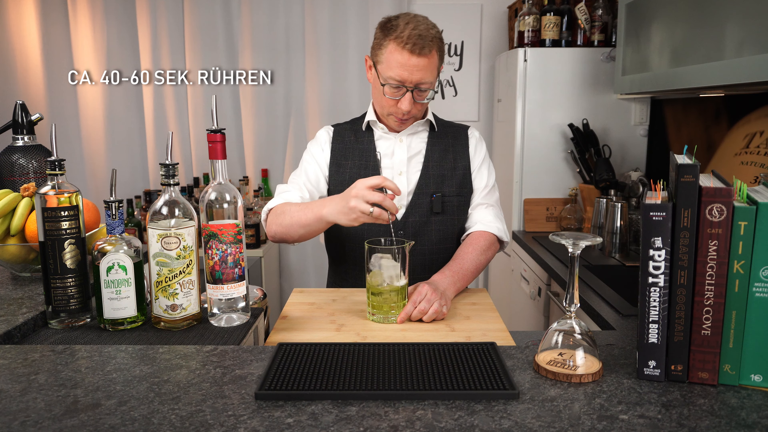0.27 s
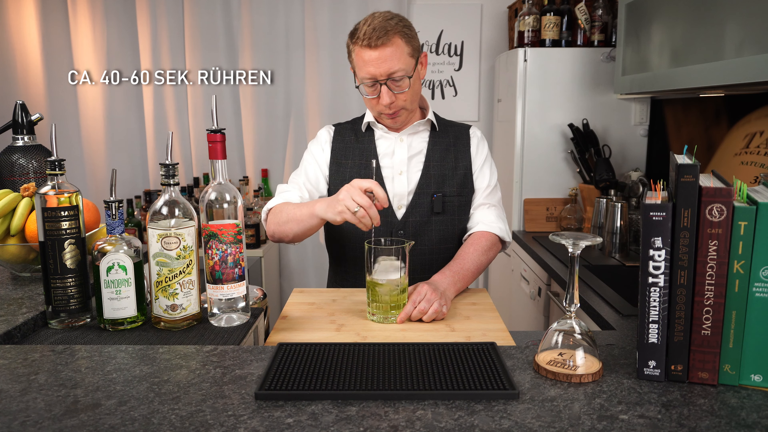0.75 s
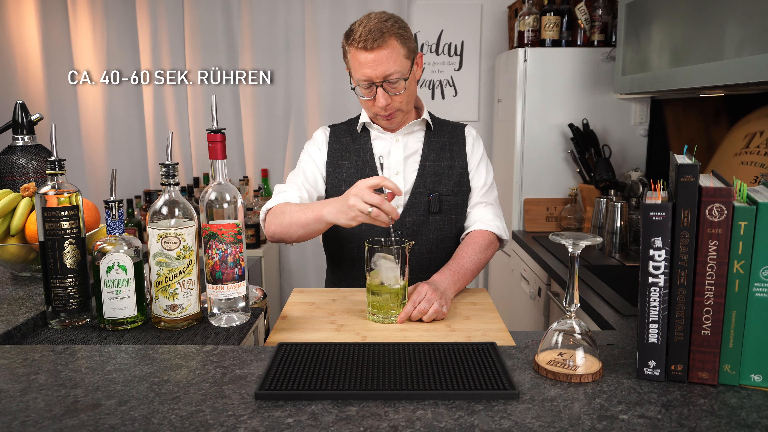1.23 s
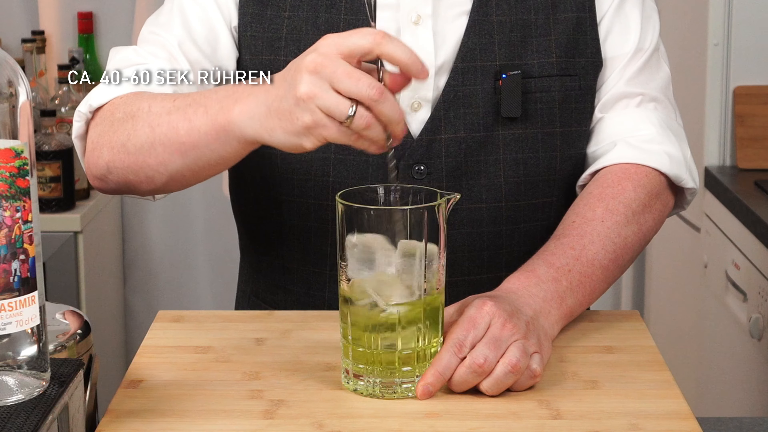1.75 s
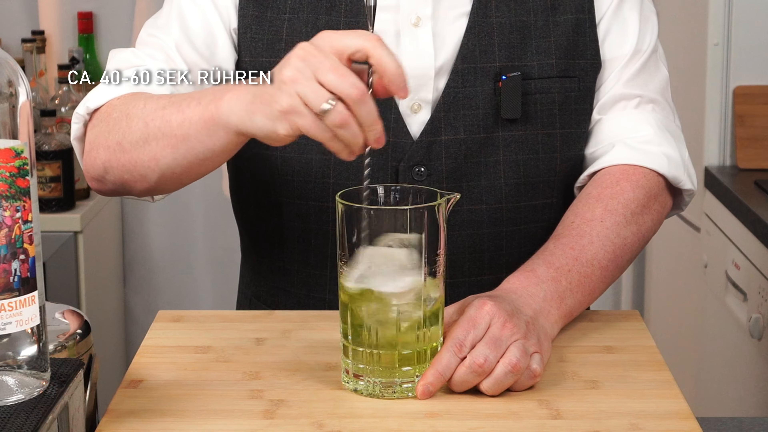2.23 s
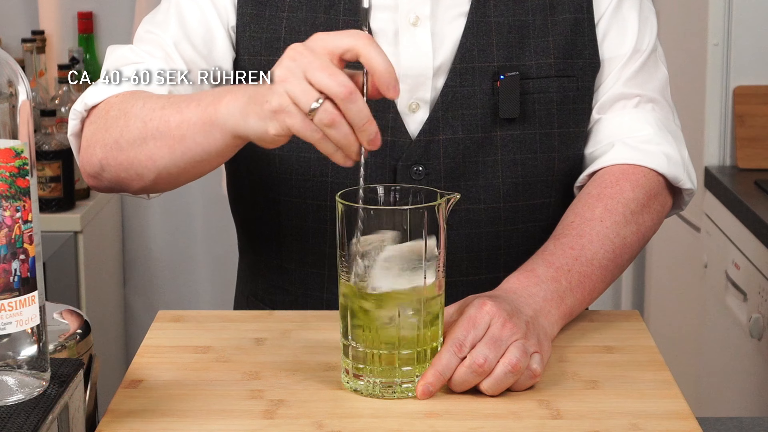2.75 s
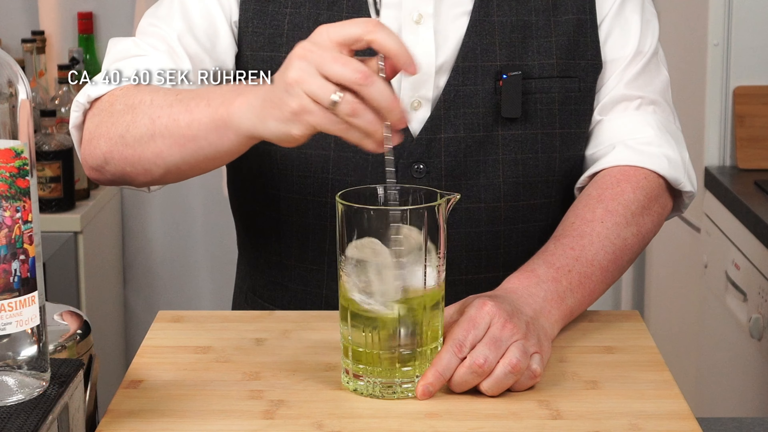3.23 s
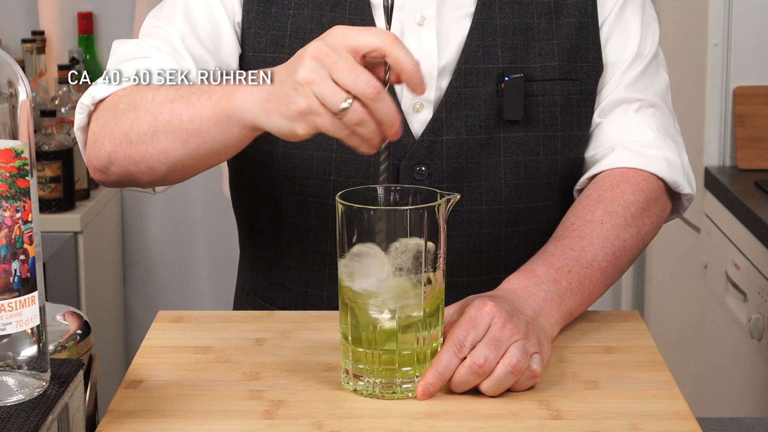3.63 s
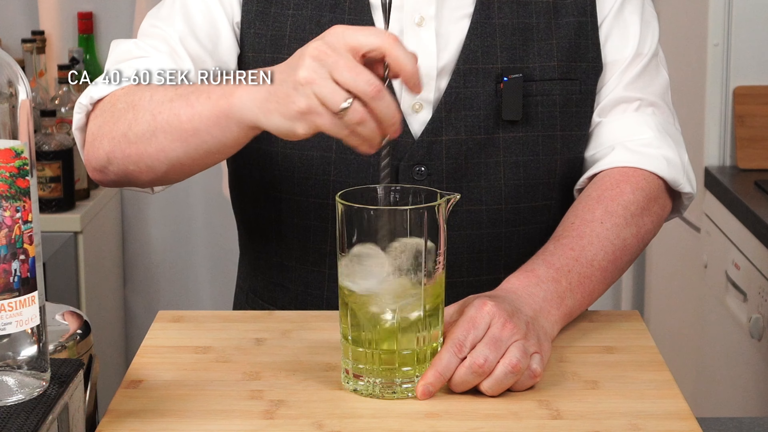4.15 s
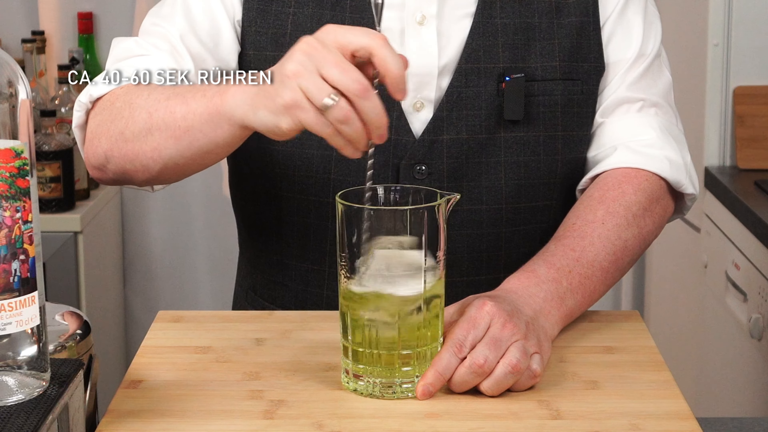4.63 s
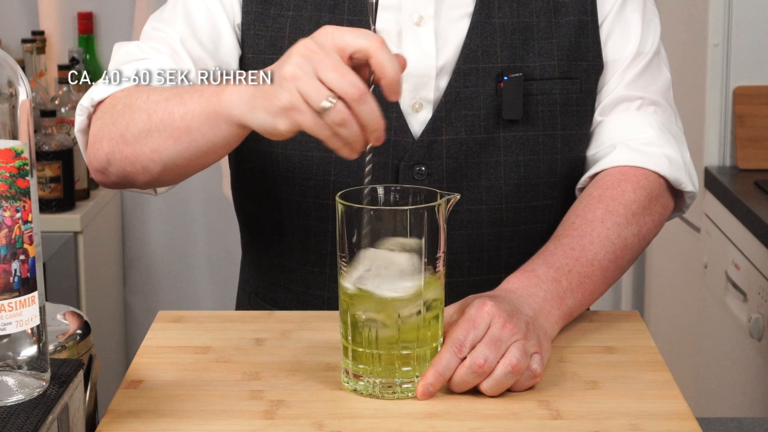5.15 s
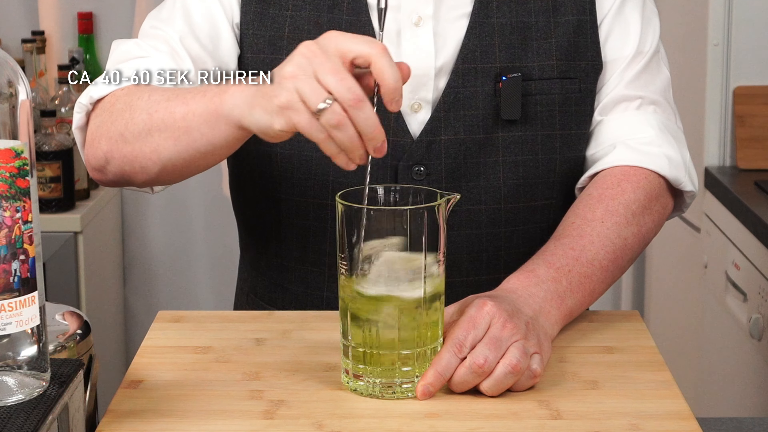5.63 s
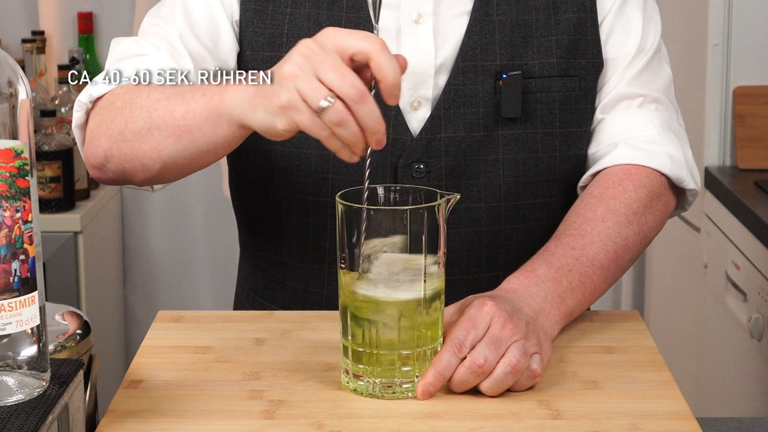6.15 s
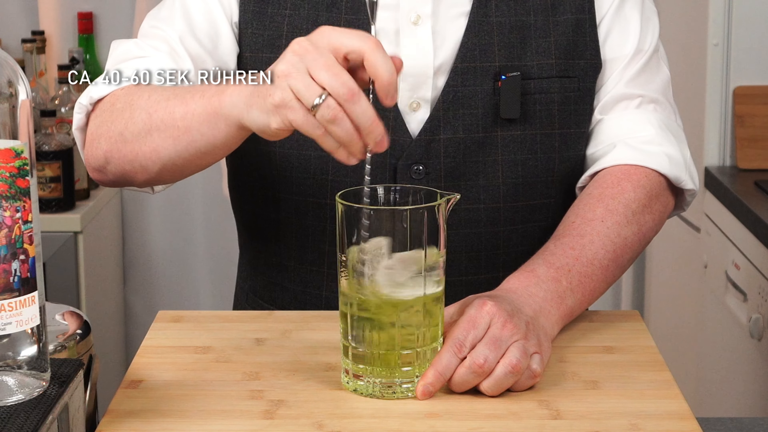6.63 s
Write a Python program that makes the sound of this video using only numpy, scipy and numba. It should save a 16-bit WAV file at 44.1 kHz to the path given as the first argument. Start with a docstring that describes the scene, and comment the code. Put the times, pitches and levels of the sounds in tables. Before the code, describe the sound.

A metal spoon stirs ice cubes in a thick glass, with rapid clinks, clacks and soft thuds into a wooden board.

```python
"""A small kitchen, heard in mono from close by: a bar spoon stirs ice in a thick mixing glass on a wooden board.
From the start, cubes and spoon knock the wall, whose modes ring briefly; cubes clack, blows thud into the board.
The highest wall ring is freest in the first two seconds; a dull low bump passes through the counter near 2.4 s.
Wall pitch then sags; cube clacks crowd in from about 4 s, with spoon ticks and fading spray to the end.
Throughout, small touches murmur on the same modes over a hiss of scraping ice, faint echoes and room tone."""
import sys
import numpy as np
from scipy import signal
from scipy.fft import rfft, irfft, next_fast_len
from scipy.io import wavfile
from scipy.ndimage import uniform_filter1d
from numba import njit

SR = 44100
rng = np.random.default_rng(int(sys.argv[2]) if len(sys.argv) > 2 else 0)


def dump_mix(stems):
    """Bounce the given channels to the path in sys.argv[1] as a 16-bit WAV at rate SR."""
    frames = np.atleast_2d(stems).T  # one column per channel
    limited = np.clip(frames, -1, 1)  # hard clip at full scale
    pcm = np.round(limited * 32767).astype(np.int16)
    wavfile.write(sys.argv[1], SR, pcm)


N = 303408

# steady hush of the kitchen: (frequency [Hz], relative level [dB])
ROOM_TONE = [(20, -22), (45, -3), (65, -1), (90, 5), (120, -6), (200, -5), (1000, -12), (4000, -25),
             (8000, -38), (16000, -44)]
# dull low bump through the counter: (time [s], level [dB], starting frequency [Hz], t60 [s])
BUMP_THROUGH_COUNTER = (2.416, -25, 72, .13)
# small touches: (time [s], through the base [dB], on the wall [dB], cube on cube [dB], ping on the rim [dB])
PATTER = [(0.0, -31.5, -36.5, -45, -44), (0.65, -35.5, -37.5, -42, -53), (1.09, -29, -32.5, -43.5, -44),
          (1.22, -32, -33, -41.5, -45.5), (2.39, -30.5, -35, -47.5, -50.5), (2.63, -32.5, -36, -49.5, -62),
          (2.95, -29.5, -38, -44.5, -53), (3.14, -31.5, -40.5, -46, -53), (3.73, -31, -30.5, -36.5, -43.5),
          (3.95, -30, -34.5, -37, -45.5), (4.35, -33, -37.5, -43.5, -52.5),
          (4.92, -33.5, -34.5, -44.5, -44), (5.34, -34, -34.5, -39, -34), (5.88, -34, -38, -47, -52.5),
          (6.46, -33.5, -31, -49.5, -43), (6.88, -30.5, -36, -42, -50)]
# pitch of the wall, lowered as melt water loads it: (time [s], pitch [factor])
WATER_LOADING = [(0, 1.013), (1.5, 1.016), (3, 1.005), (5, .99), (6.88, 0.98)]
# modes of the wooden board: (nominal frequency [Hz], relative level [dB], t60 [s])
BOARD_MODES = [(195.8, -17, 0.13), (241.4, -18, 0.2), (290.4, -16, 0.16), (402, -18.5, 0.22),
               (543.6, -3.5, 0.063), (682, -8, 0.054), (952, -4, 0.03), (1154, -1, 0.036),
               (1508, -21, 0.11)]
# modes of the steel spoon: (nominal frequency [Hz], relative level [dB], t60 [s])
SPOON_MODES = [(6550, -4, .035), (7560, -3, .05), (8980, -2, .05), (9550, -7, .035), (10400, -5, .05),
               (11750, -7, .05), (12200, -10, .035), (14000, -18, .04), (15600, -18, .03)]
# modes of the ice: (nominal frequency [Hz], relative level [dB], t60 [s])
ICE_MODES = [(2700, -20, 0.084), (2740, -18.5, 0.0033), (2995, -5.5, 0.008), (3357, -2, 0.011)]
# low modes of the glass wall: (nominal frequency [Hz], relative level [dB], t60 [s])
WALL_HUM = [(1780, -49, 0.037), (1857.6, 4, 0.075), (1897, 9, 0.044), (2036, -25.5, 0.085)]
# middle modes of the glass wall: (nominal frequency [Hz], relative level [dB], t60 [s])
WALL_PING = [(4550, -8, 0.06), (4625, -10, 0.05), (4860, -19, 0.03), (5150, -31, 0.03), (6020, -17, 0.045),
             (6230, -18, 0.04)]
# high modes of the glass wall: (nominal frequency [Hz], relative level [dB], t60 [s])
WALL_OVERTONES = [(8030, 0, .13), (7950, -2, .1), (11850, -20, .06)]
# how freely the dry upper wall sings its overtones: (time [s], level against the ping [dB])
OVERTONE_SHARE = [(0, -28), (.36, -23), (1.8, -27), (2.6, -39), (4, -37), (6.88, -40)]
# chance spread of mode strengths from knock to knock: body -> (spread [dB])
MODE_SCATTER = {"board": 1.5, "wall": 2.5, "ice": 4, "spoon": 4}
# band of wall overtones and spoon: (low edge [Hz], high edge [Hz])
TREBLE_BAND = (4200, 15800)
# ice shoved against the glass, thudding into the board: (time [s], thud level [dB])
SHOVES = [(0.237, -19.5), (0.44, -25), (0.638, -20), (0.673, -18.5), (0.796, -10), (0.875, -17.5),
          (0.979, -33), (1.055, -22), (1.083, -14.5), (1.172, -19), (1.203, -14), (1.408, -17),
          (1.516, -31), (1.739, -14.5), (1.877, -25), (1.968, -19), (2.038, -18.5), (2.07, -17.5),
          (2.272, -13), (2.323, -23), (2.617, -24.5), (2.718, -22.5), (2.811, -7), (2.878, -24),
          (3.002, -34), (3.101, -12.5), (3.147, -22), (3.261, -19.5), (3.371, -15.5), (3.428, -18.5),
          (3.537, -12), (3.809, -20.5), (3.874, -9.5), (4.06, -14), (4.154, -18.5), (4.316, -18.5),
          (4.405, -17.5), (4.47, -22.5), (4.575, -25), (4.833, -16), (4.927, -13), (5.056, -16.5),
          (5.089, -19), (5.134, -29), (5.39, -27), (5.431, -8.5), (5.525, -53.5), (5.561, -26),
          (5.682, -15), (5.741, -20), (5.978, -24), (6.127, -19), (6.303, -21.5), (6.648, -20),
          (6.831, -22.5)]
# steel spoon ticking on glass or ice: (time [s], tick level [dB])
TICKS = [(0.3607, -45), (0.7983, -33.5), (1.0086, -44), (1.0374, -52), (1.0845, -36), (1.0937, -50),
         (1.507, -53), (1.7404, -45), (1.7964, -55), (2.0027, -47.5), (2.2752, -39), (2.4204, -45),
         (2.5714, -54), (2.81, -30.5), (3.1007, -36), (3.3708, -42), (3.3984, -50), (3.8719, -32.5),
         (3.927, -55), (3.9571, -35), (4.1537, -55), (4.4338, -49), (4.5453, -50), (4.7903, -52),
         (4.9285, -36.5), (4.9524, -51), (5.0559, -56), (5.1898, -49), (5.4035, -42), (5.4323, -31),
         (5.4634, -45), (5.6693, -45.5), (5.682, -33), (5.7522, -36), (5.7753, -39), (5.9779, -41.5),
         (6.4812, -56), (6.5305, -33.5), (6.5551, -35.5), (6.595, -57), (6.832, -56)]
# cubes clacking together: (time [s], clack level [dB], frequency [Hz])
CLACKS = [(0.0539, -24, 2970), (0.1271, -28, 2420), (0.157, -20.5, 2340), (0.2357, -20, 3580),
          (0.2693, -26, 2550), (0.3601, -18, 2494), (0.6043, -22, 3490), (0.6783, -16.5, 2520),
          (0.9463, -34, 3440), (0.976, -28, 2450), (1.0083, -23, 2490), (1.1656, -29, 3300),
          (1.2036, -38, 2600), (1.307, -23.5, 2620), (1.3616, -24, 2460), (1.41, -15.5, 2510),
          (1.4944, -40, 3500), (1.5085, -15.5, 3500), (1.5802, -24, 3360), (1.6765, -31, 2590),
          (1.7963, -34, 2460), (1.7956, -21, 3530), (1.8747, -25.5, 2560), (1.9825, -24, 2570),
          (2.5506, -26, 2750), (2.7512, -25, 2600), (2.9547, -28, 2640), (3.048, -26, 2710),
          (3.3371, -21.5, 2560), (3.4931, -21.5, 3380), (3.8728, -24, 3080), (3.9065, -14, 2860),
          (3.9555, -20.5, 2860), (3.9796, -30, 3350), (4.1839, -25, 2830), (4.3182, -27.5, 2890),
          (4.345, -14, 2630), (4.4202, -18, 3050), (4.4329, -11, 2750), (4.5436, -20.5, 3370),
          (4.6083, -22.5, 2710), (4.7017, -17.5, 2880), (4.7685, -24, 2650), (4.7913, -16, 3120),
          (4.855, -15.5, 2720), (4.9375, -23, 2810), (4.9512, -17, 2990), (5.0559, -22, 3110),
          (5.1068, -26, 2860), (5.135, -17.5, 2540), (5.1916, -18, 2780), (5.2072, -14.5, 3080),
          (5.2678, -22.5, 2940), (5.4028, -18, 2900), (5.4656, -15.5, 3020), (5.5125, -27.5, 2750),
          (5.5258, -19.5, 2730), (5.6225, -26.5, 2940), (5.7082, -24, 2740), (5.8468, -29, 2620),
          (5.8844, -24.5, 2910), (5.917, -27.5, 2620), (5.9771, -21, 2860), (6.1295, -27.5, 3030),
          (6.1594, -25.5, 2850), (6.2293, -26.5, 2650), (6.4803, -21, 2500), (6.559, -23, 3270),
          (6.74, -26.5, 2750), (6.834, -25.5, 3520)]
# cubes clinking on the wall: (time [s], wall hum level [dB], wall ping level [dB])
CLINKS = [(0.0553, -19, -22.5), (0.1281, -27, -41), (0.1575, -21, -33), (0.2342, -25, -33),
          (0.2698, -20, -33), (0.3311, -31, -33), (0.3456, -17, -44), (0.3616, -13, -9.5),
          (0.4534, -20.5, -28), (0.5267, -15.5, -32), (0.606, -23, -42), (0.6394, -20.5, -44),
          (0.6724, -22, -32), (0.6814, -19.5, -16.5), (0.7107, -25, -27.5), (0.7575, -23, -38),
          (0.7657, -20.5, -29.5), (0.8305, -19, -29.5), (0.8759, -20.5, -30.5), (0.9492, -19, -53),
          (1.0096, -8, -25.5), (1.0374, -12.5, -33), (1.0934, -12, -38), (1.1265, -24, -30),
          (1.2037, -16, -47), (1.2322, -20, -33), (1.3069, -15.5, -24.5), (1.3149, -12.5, -22),
          (1.4097, -13.5, -22.5), (1.4231, -15.5, -26), (1.5105, -12.5, -19), (1.5808, -25, -41),
          (1.5891, -22.5, -34), (1.6781, -14.5, -54), (1.7988, -13.5, -25), (1.8756, -29, -37),
          (2.003, -26, -27), (2.0692, -23.5, -40), (2.3231, -17.5, -34), (2.4917, -24, -74),
          (2.5711, -15, -30.5), (2.6304, -25.5, -45), (2.7526, -21.5, -59), (2.7656, -16, -41),
          (2.8784, -30, -54), (2.9038, -22, -41), (2.9552, -30, -45), (3.0188, -29.5, -51),
          (3.084, -24, -52), (3.1216, -17.5, -30), (3.3041, -21.5, -39), (3.3383, -18.5, -36),
          (3.398, -31, -32.5), (3.4935, -19.5, -28), (3.6523, -21.5, -25), (3.692, -22, -43),
          (3.7232, -30, -31.5), (3.8437, -24, -39), (3.9165, -17, -41), (3.9264, -20, -23),
          (3.9574, -11.5, -16), (4.1087, -24, -45), (4.131, -22, -32.5), (4.1504, -36, -30),
          (4.3176, -24, -36), (4.3555, -35, -38), (4.384, -17.5, -45), (4.4338, -25, -43),
          (4.512, -35, -32), (4.6069, -19, -28.5), (4.6448, -25, -36.5), (4.791, -19, -43),
          (4.8536, -21, -42), (4.951, -23, -29.5), (5.1056, -27, -25.5), (5.1362, -20.5, -29),
          (5.19, -18.5, -32), (5.2058, -21, -20), (5.244, -27.5, -45), (5.3548, -26, -28),
          (5.4033, -20, -24), (5.4645, -12.5, -31), (5.4874, -30, -27.5), (5.5263, -18, -44),
          (5.5643, -18, -33), (5.5962, -24, -54), (5.7079, -20.5, -26.5), (5.7533, -23, -25),
          (5.7744, -22, -28), (5.8461, -16, -28.5), (5.9783, -18, -19), (6.0118, -23, -32.5),
          (6.0342, -18.5, -37), (6.1233, -26, -31), (6.1599, -24, -33), (6.2322, -16.5, -28),
          (6.347, -27, -46), (6.3836, -27.5, -32), (6.4477, -19, -49), (6.4783, -22, -22),
          (6.5318, -24, -26), (6.5954, -24.5, -56), (6.6478, -27.5, -57), (6.7441, -16.5, -30),
          (6.7603, -21, -28), (6.7756, -19, -32), (6.8331, -17.5, -29.5)]

ROOM_TONE_DB, KITCHEN_DB = -54.5, -24
KITCHEN_T60_S, WALL_CUT_HZ = 0.28, 10000  # decay before the walls' treble loss
CUTOFF_HZ = 16500
# every knock also wakes the other bodies, at these offsets from its own sound
CLINK_THUD_DB, CLINK_CLACK_DB, CLINK_TICK_DB = -14.5, -3, -37  # the tick is set against the ping
CLACK_HUM_DB, CLACK_THUD_DB, CLACK_PING_DB, CLACK_TICK_DB = -14, -12.5, -16, -49.5
SHOVE_HUM_DB, SHOVE_CLACK_DB, SHOVE_PING_DB, SHOVE_TICK_DB = -17, -15, -23, -54.5
TICK_HUM_DB, TICK_THUD_DB, TICK_CLACK_DB, TICK_PING_DB = -1, 14, 5.5, 1.5
SIDE_SCATTER_DB = 3
RIM_DB, SCRAPE_DB = -3, -13  # against the rim patter
OVERTONE_SAG = 0.35  # exponent: the overtones follow the wall's pitch only in part
SPRAY_PER_S, SPRAY_SMOOTH = 1500, 0.6  # mean droplet rate before clumping, and the floor of even hiss
SPRAY_T60_S = 0.12
THUD_PITCH = 0.98  # a firm blow rings the board slightly lower


def from_db(db):
    """Decibels to gain."""
    return 10 ** (np.asarray(db) / 20)


def rms_one(x):
    """Scale to rms 1."""
    return x / np.sqrt(np.mean(x ** 2) + 1e-20)


def in_time(rows):
    """One value per sample for each column after the time."""
    s, *columns = np.transpose(rows)
    return [np.interp(np.arange(N) / SR, s, column) for column in columns]


def drift(rate_hz):
    """Slow chance of rms 1: noise through two equal one-pole low-passes, drawn every 40 samples."""
    r = np.exp(-80 * np.pi * rate_hz / SR)
    noise = rng.standard_normal(N // 40 + 2002)
    slow = signal.lfilter([1], [1, -2 * r, r * r], noise)[2000:]  # drop the filter's run-in
    return np.interp(np.arange(N) / 40, np.arange(len(slow)), rms_one(slow))


def band(x, low_hz, high_hz):
    """Soft contacts leave little far above or below the modes they excite."""
    return signal.sosfilt(signal.butter(3, [low_hz, high_hz], "band", fs=SR, output="sos"), x)


def room_tone():
    """Steady coloured hush of the kitchen: noise shaped by a smooth spectrum."""
    hz, db = np.transpose(ROOM_TONE)
    bins = np.maximum(np.arange(N // 2 + 1) * SR / N, 1)
    colour = from_db(np.interp(np.log(bins), np.log(hz), db))
    hush = irfft(rfft(rng.standard_normal(N)) * colour, N)
    return from_db(ROOM_TONE_DB) * rms_one(hush)


def kitchen(x):
    """Reflections of the small kitchen: ten feedback delays, duller on every round."""
    size = next_fast_len(N + SR)
    w = 2 * np.pi * np.arange(size // 2 + 1) / size
    dull = 1 / (1 + 1j * w * SR / (2 * np.pi * WALL_CUT_HZ))
    wet = 0
    for k, lag in enumerate(np.geomspace(0.009, 0.031, num=10) * SR):
        loop = from_db(-60 * lag / SR / KITCHEN_T60_S) * dull * np.exp(-1j * w * lag)
        wet = wet + (-1) ** k * loop / (1 - loop)
    return irfft(rfft(x, size) * wet, size)[:N]


def bump():
    """One soft push rings the counter: a low sine that swells fast, dies and glides down."""
    s, db, hz, t60 = BUMP_THROUGH_COUNTER
    t = np.maximum(np.arange(N) / SR - s, 0)
    swell = 1 - np.exp(-t / 0.0019)
    return from_db(db - 60 * t / t60) * swell * np.sin(2 * np.pi * hz * t * (1 - t))


@njit
def resonate(clicks, cos_w, sin_w, r):
    """A two-pole ring whose pitch may move."""
    out = np.zeros(len(clicks))
    for i in range(2, len(clicks)):
        out[i] = 2 * r * cos_w[i] * out[i - 1] - r * r * out[i - 2] + sin_w[i] * clicks[i - 1]
    return out


def ring(clicks, hz, t60):
    """A unit click sets a dying sine of height about 1 ringing."""
    w = 2 * np.pi * hz / SR * np.ones(N)
    return resonate(clicks + 1e-18, np.cos(w), np.sin(w), from_db(-60 / (t60 * SR)))


def touches(per_s, spread_db):
    """Random clicks of uneven size, in clumps; rms 1."""
    size_db = spread_db * np.minimum(rng.exponential(1, N), 4)
    sizes = from_db(size_db) * rng.choice([-1, 1], N)
    chance = per_s * from_db(4 * drift(9)) / SR
    return rms_one(sizes * (rng.random(N) < chance))


def pattered(modes, clicks, level_db, pitch):
    """Small touches keep the modes murmuring."""
    murmur = sum(from_db(db) * ring(clicks, hz * pitch, t60) for hz, db, t60 in modes)
    return from_db(level_db) * rms_one(murmur)


def chatter(count, t60):
    """Wet ice skips on the surface: a firm click, then uneven ones within 14 ms; unit energy per row."""
    size = (count, 600)
    skips = rng.standard_normal(size) * (rng.random(size) < 0.03)
    skips[:, 0] = 2.12
    skips = skips * from_db(-60 * np.arange(600) / (t60 * SR))
    return skips / np.sqrt(np.sum(skips ** 2, axis=1, keepdims=True))


def blows(s, level_db, contact):
    """Each knock is a short contact at its own level, shaped by its row of contact."""
    at = np.round(s * SR).astype(int)[:, None] + np.arange(contact.shape[1])
    clicks = np.zeros(N + contact.shape[1])
    np.add.at(clicks, at, from_db(level_db)[:, None] * contact)
    return clicks[:N]


def struck(modes, s, knock_db, contact, pitch, scatter_db):
    """Each knock lands elsewhere, so its energy is shared out among the modes anew."""
    usual = from_db(np.array(modes)[:, 1])
    share = usual * from_db(scatter_db * rng.normal(0, 1, (len(s), len(modes))))
    share_db = 20 * np.log10(share / np.linalg.norm(share, axis=1, keepdims=True))
    total = 0
    for k, (hz, _, t60) in enumerate(modes):
        total = total + ring(blows(s, knock_db + share_db[:, k], contact), hz * pitch, t60)
    return total


def crack(s, level_db, t60):
    """A burst of noise that dies after each knock."""
    clicks = blows(s, level_db, np.ones((len(s), 1)))
    dying = signal.lfilter([1], [1, -from_db(-60 / (t60 * SR))], clicks)
    return dying * rng.standard_normal(N)


def beside(level_db, *offsets_db):
    """Levels of the other bodies that a knock wakes, each scattered by chance."""
    return [level_db + offset + SIDE_SCATTER_DB * rng.standard_normal(len(level_db)) for offset in offsets_db]


def knocks():
    """All knocks, grouped by kind: rows of time [s], then hum, thud, clack, ping and tick levels [dB]."""
    s, thud = np.transpose(SHOVES)
    hum, clack, ping, tick = beside(thud, SHOVE_HUM_DB, SHOVE_CLACK_DB, SHOVE_PING_DB, SHOVE_TICK_DB)
    shoves = [s, hum, thud, clack, ping, tick]
    s, tick = np.transpose(TICKS)
    hum, thud, clack, ping = beside(tick, TICK_HUM_DB, TICK_THUD_DB, TICK_CLACK_DB, TICK_PING_DB)
    ticks = [s, hum, thud, clack, ping, tick]
    s, clack, _ = np.transpose(CLACKS)
    hum, thud, ping, tick = beside(clack, CLACK_HUM_DB, CLACK_THUD_DB, CLACK_PING_DB, CLACK_TICK_DB)
    cubes = [s, hum, thud, clack, ping, tick]
    s, hum, ping = np.transpose(CLINKS)
    thud, clack = beside(hum, CLINK_THUD_DB, CLINK_CLACK_DB)
    tick, = beside(ping, CLINK_TICK_DB)
    clinks = [s, hum, thud, clack, ping, tick]
    return np.hstack([clinks, shoves, cubes, ticks])


def board(s, thud, base_db):
    """Blows pass through the base and ring the board's short low modes; small touches murmur there."""
    thuds = struck(BOARD_MODES, s, thud + 1.6, chatter(len(s), 0.012), THUD_PITCH, MODE_SCATTER["board"])
    thuds += crack(s, thud + 1.13, 0.02)
    murmur = pattered(BOARD_MODES, touches(300, spread_db=2.5), base_db, 1 + 0.041 * drift(16.3))
    return band(thuds, 313, 2340) + band(murmur, 147, 1363)


def scrape(rim_db):
    """Wet ice sliding along the wall: noise that swells and sinks by chance."""
    return from_db(rim_db + SCRAPE_DB + 21 * np.tanh(drift(19))) * rng.standard_normal(N)


def spray(s, level_db):
    """After a tick, droplets and splinters crackle on and fade."""
    droplets = np.abs(uniform_filter1d(touches(SPRAY_PER_S, spread_db=0.5), size=12))
    return crack(s, level_db, SPRAY_T60_S) * (SPRAY_SMOOTH + droplets * 3)


def spoon(s, tick, tremble):
    """A tick rings the steel's high modes, with a short crack and a longer band of spray."""
    splash = band(spray(s, tick - 8), 4300, 9800) + crack(s, tick - 9, 0.022)  # the top treble dies first
    return struck(SPOON_MODES, s, tick - 1.5, chatter(len(s), 0.043), tremble, MODE_SCATTER["spoon"]) + splash


def clacks(knock_db, contact):
    """Each pair of cubes has a strongest pitch of its own that dies at once."""
    s, db, hz = np.transpose(CLACKS)
    latest = np.searchsorted(s, np.arange(N) / SR, side="right") - 1
    return ring(blows(s, db + knock_db, contact), hz[np.maximum(latest, 0)], 0.03)


def ice(s, clack, contact, cube_db):
    """Cubes ring their short modes when struck and patter on one another, pitch wavering."""
    tumble = 1 + 0.056 * drift(23)
    struck_ice = struck(ICE_MODES, s, clack - 5, contact, tumble, MODE_SCATTER["ice"])
    pairs = clacks(1.1, chatter(len(CLACKS), 0.011))
    murmur = pattered(ICE_MODES, touches(200, spread_db=4), cube_db, tumble)
    return band(struck_ice + pairs + murmur + crack(s, clack - 3, 0.026), 1580, 3555)


def wall_hum(s, hum, contact, on_wall, wall_db, pitch):
    """Low modes of the thick wall, knocked and pattered."""
    hums = struck(WALL_HUM, s, hum + 0.5, contact, pitch, MODE_SCATTER["wall"])
    return band(hums + pattered(WALL_HUM, on_wall, wall_db, pitch), 510, 2970)


def wall_ping(s, ping, contact, on_wall, rim_db, pitch):
    """Middle modes of the wall, with the crack of each knock and the scrape of ice."""
    pings = struck(WALL_PING, s, ping + 3, contact, pitch, MODE_SCATTER["wall"])
    murmur = pattered(WALL_PING, on_wall, rim_db + RIM_DB, pitch)
    return band(pings + murmur + scrape(rim_db) + crack(s, ping - 3.5, 0.0082), 4010, 5890)


def wall_overtones(s, ping, contact, on_wall, rim_db, pitch):
    """High modes of the dry upper wall, freest early on."""
    share_db = np.interp(s, *np.transpose(OVERTONE_SHARE)) + 0.4 * (ping + 30)  # harder knocks ring brighter
    rings = struck(WALL_OVERTONES, s, ping + share_db, contact, pitch, MODE_SCATTER["wall"])
    murmur_db = rim_db + 2.5 + in_time(OVERTONE_SHARE)[0]
    return rings + pattered(WALL_OVERTONES, on_wall, murmur_db, pitch)


def scene():
    """Board, spoon, ice and glass wall up close, with the room around them."""
    s, hum, thud, clack, ping, tick = knocks()
    base_db, wall_db, cube_db, rim_db = in_time(PATTER)
    loading = in_time(WATER_LOADING)[0]
    pitch = loading * (1 + 0.013 * drift(8.7) + 0.0062 * drift(73))  # cubes leaning on the wall bend its pitch
    tremble = 1 + 0.004 * drift(5) + 0.004 * drift(60)
    upper_pitch = tremble * (loading / 1.02) ** OVERTONE_SAG
    on_wall, contact = touches(200, spread_db=4.5), chatter(len(s), 0.059)
    treble = spoon(s, tick, tremble) + wall_overtones(s, ping, contact, on_wall, rim_db, upper_pitch)
    glass = board(s, thud, base_db) + band(treble, *TREBLE_BAND)
    glass += ice(s, clack, contact, cube_db)
    glass += wall_hum(s, hum, contact, on_wall, wall_db, pitch)
    glass += wall_ping(s, ping, contact, on_wall, rim_db, pitch)
    return (room_tone() + from_db(KITCHEN_DB) * kitchen(glass) + bump() + glass)[None]


def record(dry):
    """The mono pickup: the top is cut steeply."""
    return signal.sosfilt(signal.cheby2(14, 60, CUTOFF_HZ, fs=SR, output="sos"), dry)


dry = scene()
out = record(dry)
dump_mix(out)
```